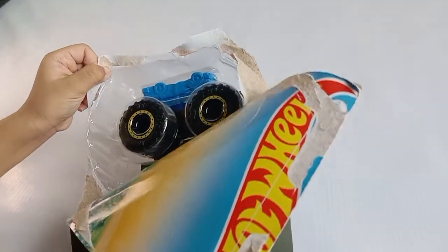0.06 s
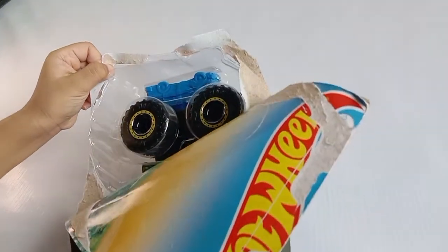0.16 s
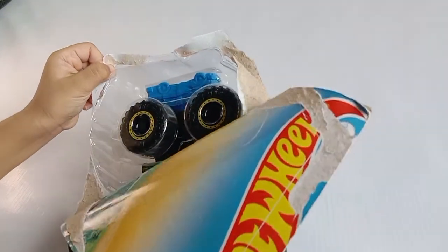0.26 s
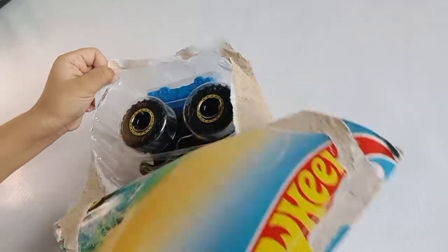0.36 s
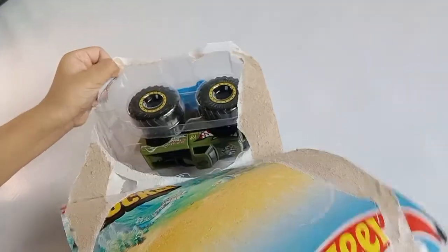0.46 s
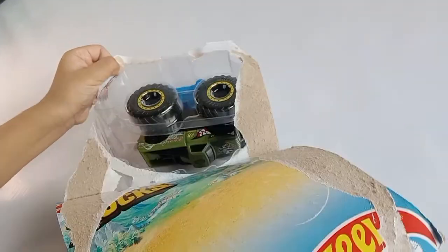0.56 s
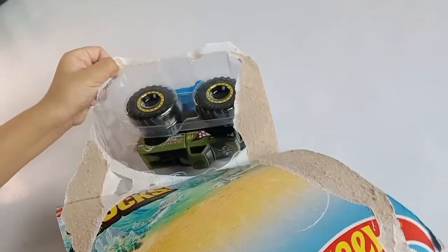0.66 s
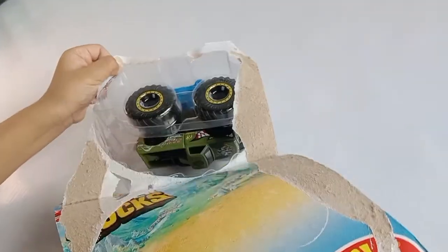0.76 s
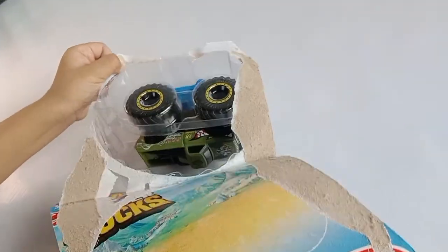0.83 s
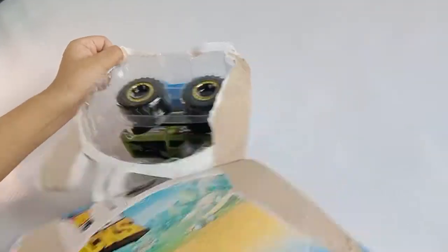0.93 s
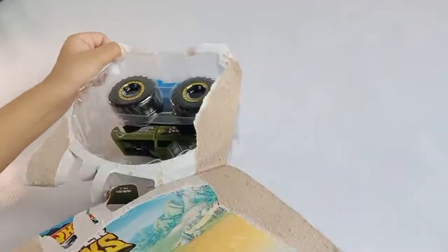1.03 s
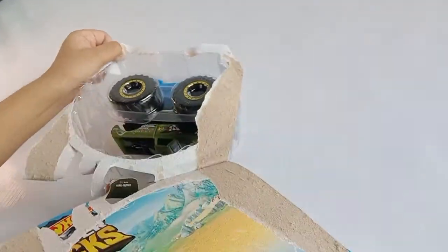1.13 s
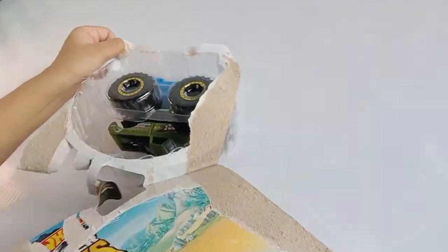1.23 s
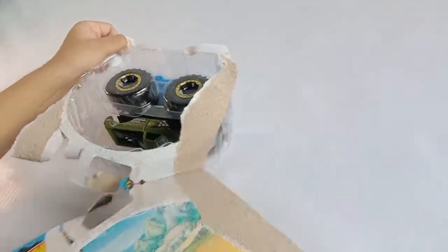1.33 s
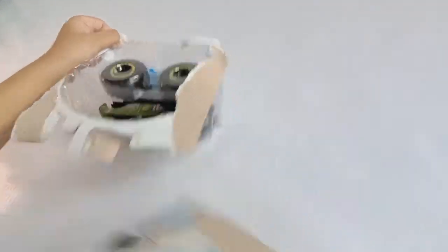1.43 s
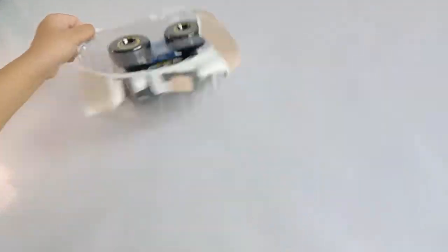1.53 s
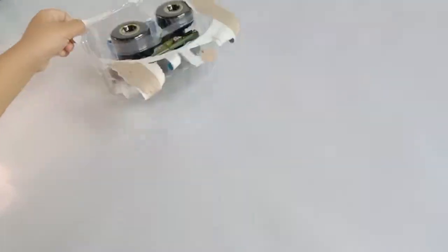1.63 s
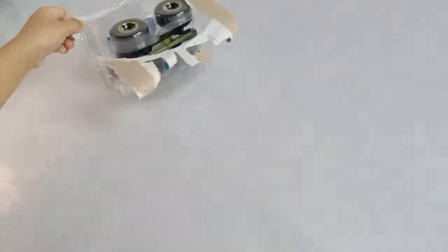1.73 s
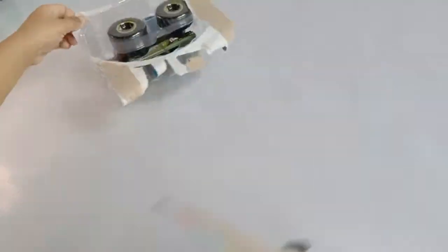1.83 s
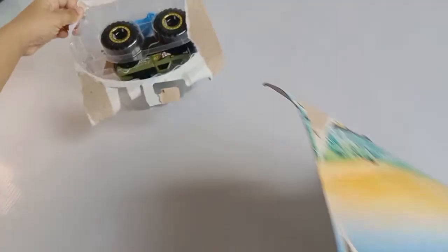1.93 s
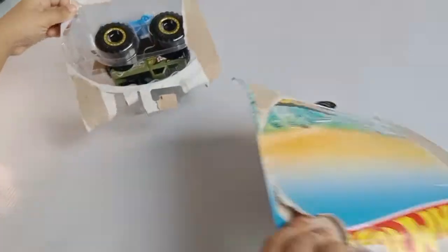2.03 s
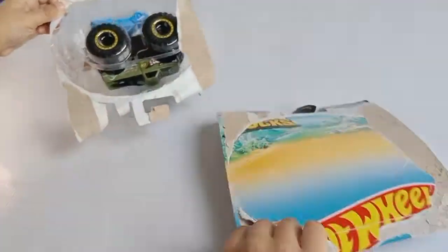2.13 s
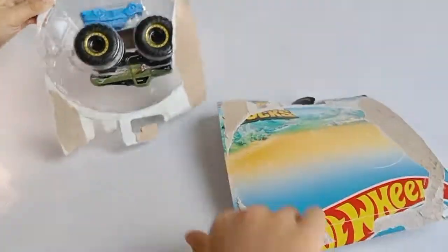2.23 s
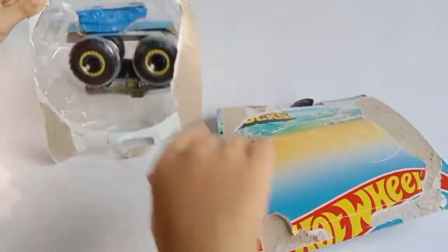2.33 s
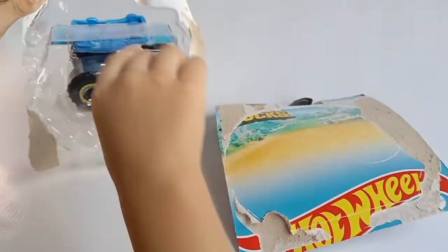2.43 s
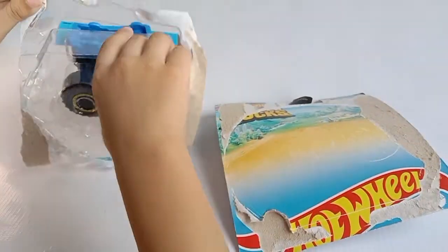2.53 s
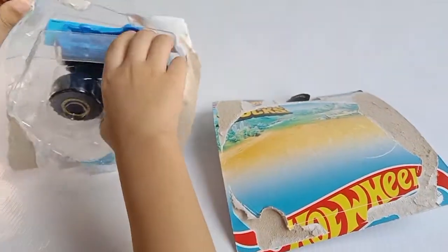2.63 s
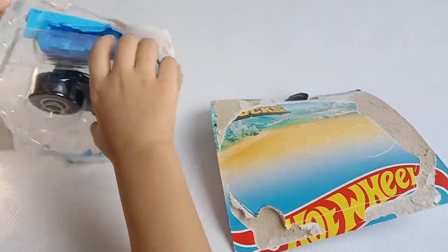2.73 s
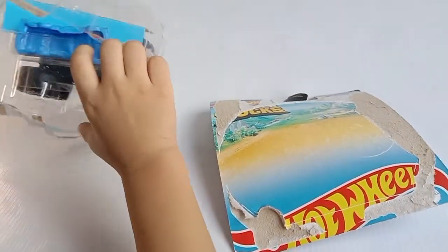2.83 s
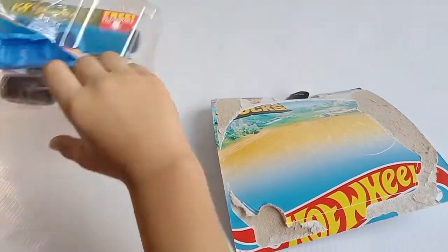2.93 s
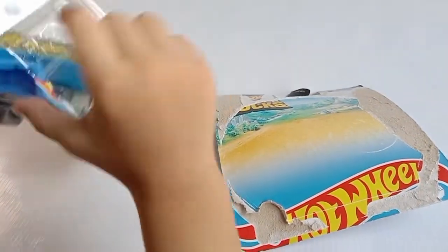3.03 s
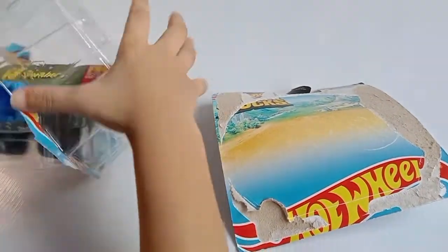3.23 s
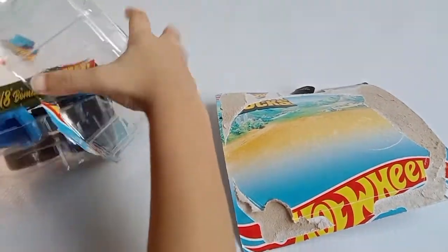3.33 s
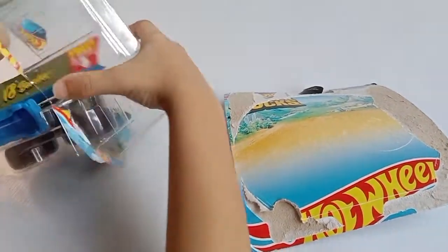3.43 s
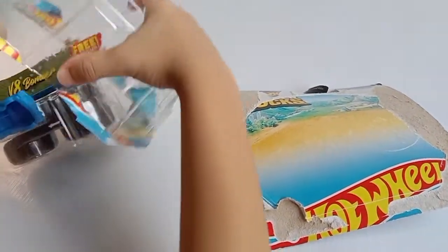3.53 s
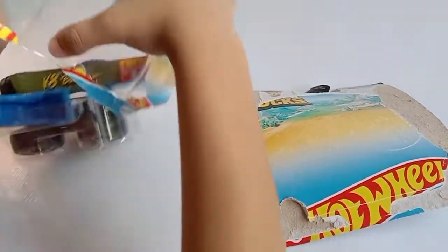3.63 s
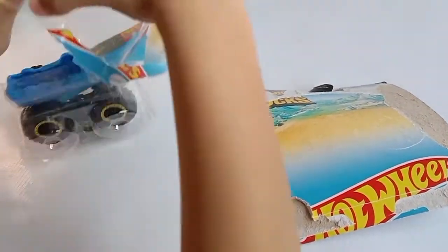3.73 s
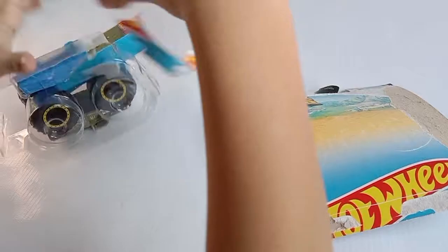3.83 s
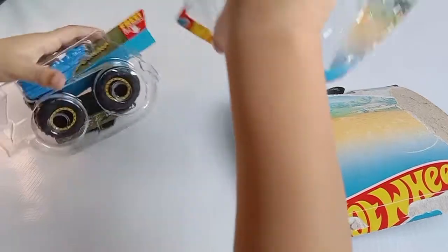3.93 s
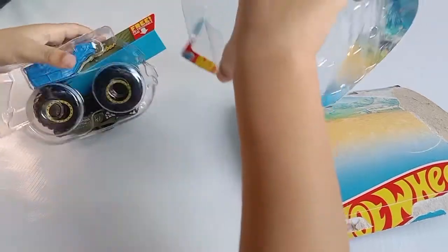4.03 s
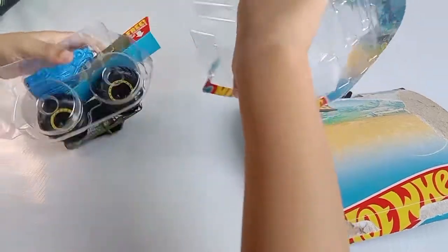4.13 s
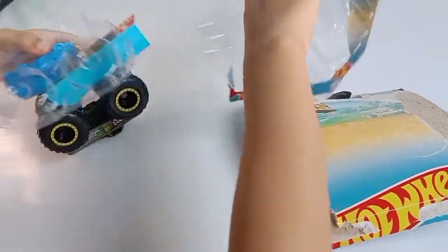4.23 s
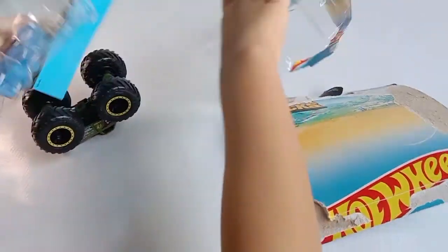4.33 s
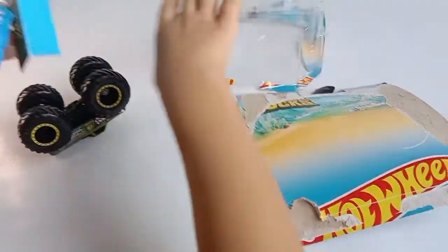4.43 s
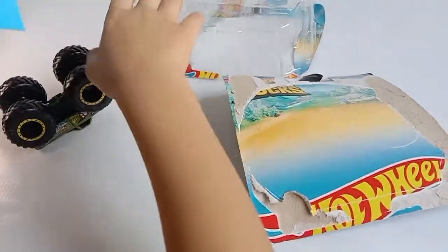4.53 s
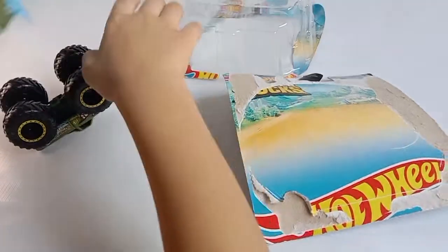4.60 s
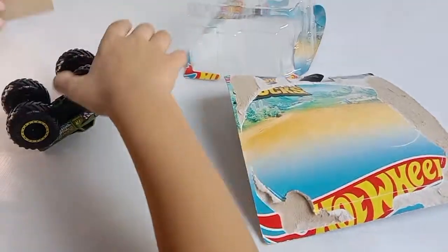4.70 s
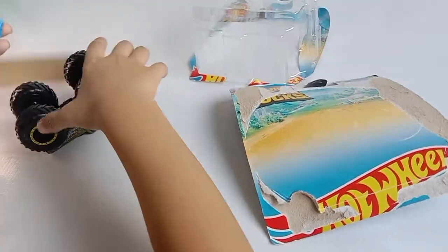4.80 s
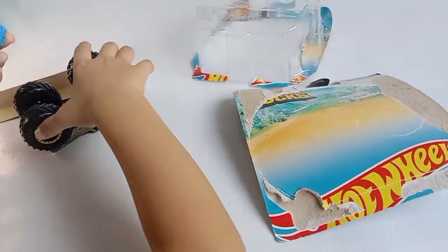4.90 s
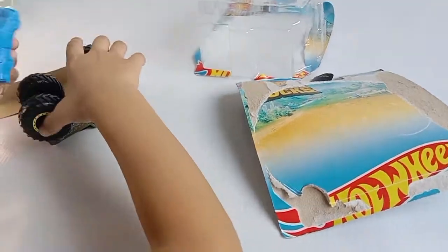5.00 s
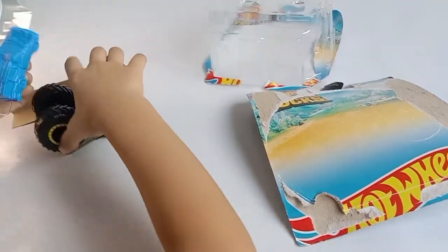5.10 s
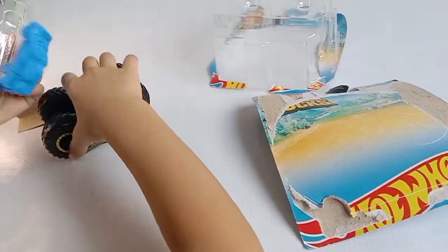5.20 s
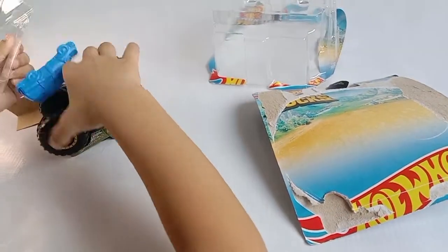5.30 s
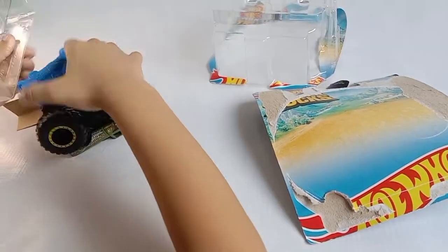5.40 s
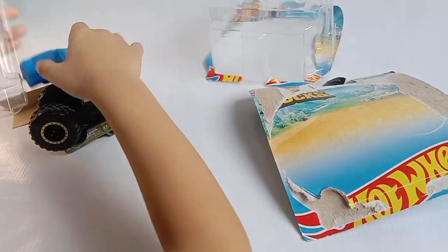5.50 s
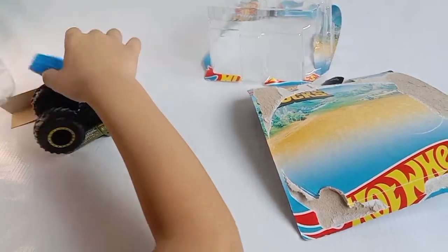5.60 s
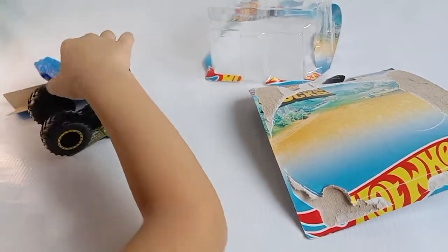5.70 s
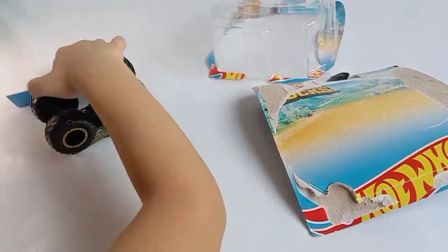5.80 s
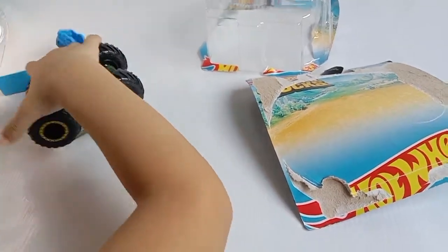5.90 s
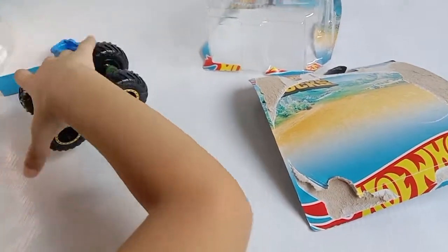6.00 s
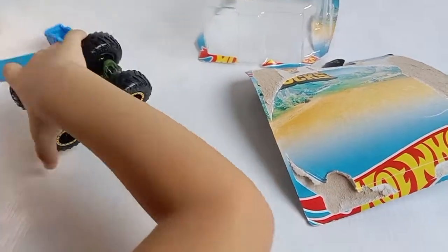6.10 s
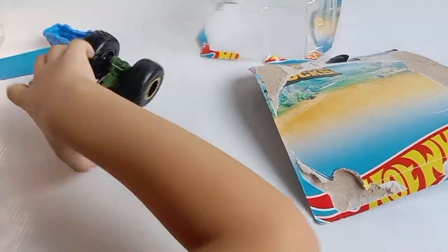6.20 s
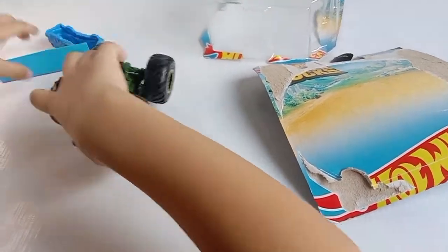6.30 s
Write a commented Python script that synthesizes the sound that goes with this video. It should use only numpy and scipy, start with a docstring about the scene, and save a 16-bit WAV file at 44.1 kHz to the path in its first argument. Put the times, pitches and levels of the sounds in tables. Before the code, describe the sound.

Close up in a small, quiet room, cardboard tears in three coarse pulls with sharp pops. After a brief lull, a thin plastic shell buckles, crunches and snaps loudly, thumping the table. The handling softens to faint crinkles and ticks, then a hollow plastic toy gives a clear rattling knock near the end.

```python
"""At a table in a small room, hands tear open a toy package of card and a thin plastic shell.
Card fibres rip in three pulls; the shell then buckles, snaps, ticks and crackles: noise rings its modes.
The toy bumps the table top with blows and rubbing noise; the toy, a tab and single panels ring as dying tones.
A short noise tail is the room's echo; filtered noise makes a faint hiss and a low hum."""
import sys
import numpy as np
from scipy import signal
from scipy.fft import rfft, irfft, next_fast_len
from scipy.io import wavfile
from scipy.ndimage import uniform_filter1d, map_coordinates

SR = 44100
rng = np.random.default_rng(int(sys.argv[2]) if len(sys.argv) > 2 else 0)


def materialize(psi):
    """Save the field psi as 16-bit PCM at rate SR to the path in sys.argv[1].

    A 1-D psi becomes a single channel; in a 2-D psi each row is a channel.
    """
    bounded = np.clip(np.atleast_2d(psi).T, -1, 1)
    quanta = np.round(bounded * 32767).astype(np.int16)
    wavfile.write(sys.argv[1], SR, quanta)


N = 280033  # samples, 6.35 s

PARTED_S = 1.6  # the card comes off
HANDS_REST_DB, TABLE_REST_DB = -86, -86  # nothing moving
# fizz over a boom of -40 dB, dB per dB of boom, dB per dB of crinkle
FIZZ_DB, FIZZ_GROWS, FIZZ_BRIGHT = -15.5, 0.54, 0.28


def package():
    """Steady handling and single snaps shake the same four bodies: shell, folds, fibres and table."""
    boom_db, crinkle_db, fizz_db, shell_hz, fold_hz = hands()
    shell_snaps, fold_snaps, fibre_snaps, table_snaps = snaps()
    breaks = crackle(per_second=250.0, spread_db=1.5, life=0.01, smooth=0.29)
    fine = crackle(per_second=500.0, spread_db=9.5, life=0.0018, smooth=0.69)
    card = np.arange(N) < PARTED_S * SR
    gentle_db = np.clip(-36 - crinkle_db, 0, 12)
    return (shell_boom(breaks, boom_db, shell_hz, shell_snaps, card)
            + fold_crinkle(breaks, fine, crinkle_db, fold_hz, fold_snaps, card, gentle_db)
            + tearing(breaks, fine, crinkle_db, card, gentle_db)
            + fibre_fizz(breaks, fine, fizz_db, fibre_snaps + ticks())
            + table_top(table_snaps))


# Three pulls that rip the card, one list each.
# Each row: time in seconds, level in dB, fizz over it in dB.
PULLS = [
    [(0.0, -48.5, -13.5), (0.166, -34, -10.5), (0.172, -26.5, -13.5), (0.208, -26.5, -11), (0.25, -21, -8),
     (0.402, -55, -11), (0.45, -53, -6.5), (0.49, -81, -3.5)],
    [(0.49, -84, -3), (0.622, -53.5, -2), (0.628, -48, -0.5), (0.71, -44, -7.5), (0.752, -29, -9.5),
     (0.826, -26.5, -15.5), (0.872, -38, -13.5), (0.94, -97.5, 8.5)],
    [(1.02, -84, -3), (1.094, -49.5, -9), (1.26, -31, -13.5), (1.286, -34.5, -13), (1.32, -27.5, -22.5),
     (1.336, -39.5, -21), (1.476, -43.5, -6.5), (1.63, -77.5, -4.5)],
]
PULL_SHELL_HZ, PULL_FOLD_HZ = [885, 1240, 1000], 2700  # favoured pitch of each pull; of all pulls
PULL_CRINKLE_DB = -9  # over the boom
# Squeezes and shifts of the shell. Each row: peak time in seconds, boom in dB, rise in seconds,
# fall in seconds, crinkle over the boom in dB, favoured shell pitch in Hz, favoured fold pitch in Hz.
SQUEEZES = [(0.03, -45, 0.046, 0.065, -19, 810, 2000), (0.155, -29.5, 0.11, 0.13, -10, 994, 1954),
            (1.768, -54.5, 0.024, 0.19, 2, 1100, 2040), (2.278, -29, 0.089, 0.058, -8, 830, 2370),
            (2.4, -54, 0.27, 0.32, 7, 890, 2500), (2.47, -52, 0.053, 0.72, -6.5, 725, 2300),
            (2.814, -24, 0.097, 0.18, -6, 760, 2170), (3.002, -27, 0.071, 0.11, -3.5, 800, 2500),
            (3.168, -22, 0.058, 0.2, -5, 725, 2580), (3.339, -30, 0.28, 0.093, -9, 830, 2450),
            (3.445, -26, 0.039, 0.11, -2, 910, 2330), (3.592, -30, 0.7, 0.14, -5.5, 855, 2390),
            (3.66, -36.5, 0.06, 0.037, 0, 870, 2370), (3.87, -45.5, 0.049, 0.17, 9, 870, 2680),
            (3.961, -44.5, 1, 0.056, -6.5, 890, 2550), (4.078, -48, 0.054, 0.17, -4, 780, 2600),
            (4.234, -28.5, 0.037, 0.19, -11, 613, 2540), (4.324, -36, 0.016, 0.16, -54, 516, 2380),
            (4.469, -54.5, 0.37, 0.12, -0.5, 610, 3000), (4.702, -55, 0.032, 0.15, 10, 673, 3100),
            (4.86, -47.5, 0.0048, 0.18, 4, 1250, 2120), (5.201, -65.5, 0.042, 1, -2, 610, 2390),
            (5.361, -70.5, 0.049, 0.31, 19.5, 616, 2240), (5.488, -53.5, 0.075, 0.091, -1, 718, 2700),
            (5.851, -51.5, 0.071, 0.062, -1.5, 1180, 2250), (5.75, -59.5, 0.068, 0.085, 8, 760, 2280),
            (5.944, -26, 0.027, 0.11, -10, 1140, 2360), (6.052, -51.5, 0.024, 0.11, 5.5, 1166, 2100),
            (6.31, -43, 0.092, 0.13, 3, 1400, 2180)]
SQUEEZE_SHAPE = 0.81  # how a fall bends: 1 straight, more lingers and then drops


def hands():
    """Pulls and squeezes add their power into boom, crinkle and fizz; the loudest steers the pitch."""
    t = np.arange(N) / SR
    pulls = np.array([np.interp(t, *np.transpose(pull)[:2], left=-200, right=-200) for pull in PULLS])
    pull_fizz_db = curves(np.vstack(PULLS))[1]
    squeezes = swells(SQUEEZES, SQUEEZE_SHAPE)
    db, bright, shell_hz, fold_hz = np.array(SQUEEZES).T[[1, 4, 5, 6]]
    squeeze_fizz_db = FIZZ_DB + (FIZZ_GROWS - 1) * (db + 40) + FIZZ_BRIGHT * bright

    boom = np.vstack([pulls, squeezes])
    crinkle = np.vstack([pulls + PULL_CRINKLE_DB, squeezes + bright[:, None]])
    fizz = np.vstack([pulls + pull_fizz_db, squeezes + squeeze_fizz_db[:, None]])
    all_fold_hz = np.r_[[PULL_FOLD_HZ] * len(PULLS), fold_hz]
    boom_db, shell_hz = blend(boom, HANDS_REST_DB, np.r_[PULL_SHELL_HZ, shell_hz])
    crinkle_db, fold_hz = blend(crinkle, HANDS_REST_DB, all_fold_hz)
    fizz_db, = blend(fizz, HANDS_REST_DB)
    return boom_db, crinkle_db, fizz_db, shell_hz, fold_hz


# Resonances of the plastic shell, each rung by two equal filters in a row.
# Each row: pitch in Hz, width of one filter in Hz, relative level in dB.
SHELL_MODES = [(383.6, 342, 0), (615.7, 87, 2.5), (683, 113, 2), (770.4, 170, -0.5), (885, 210, -0.5),
               (1061, 100, -1.5), (1197.7, 130, 4.5), (1273.6, 120, -5.5), (1474, 110, -3)]


def shell_boom(breaks, boom_db, shell_hz, blows, card):
    """Crackling force rings the broad panels of the shell; the card makes that force smoother."""
    force = np.where(card, unit(breaks + rng.standard_normal(N)), breaks)
    focus_db, swell_db = np.where(card, 8, 7.0), np.where(card, 2.5, 4.5)
    return struck(amp(boom_db) * force, shell_hz, blows, SHELL_MODES, focus_db, swell_db)


# Resonances of the small folds, each rung by two equal filters in a row.
# Each row: pitch in Hz, width of one filter in Hz, relative level in dB.
FOLD_MODES = [(1814, 410, 4), (2128, 200, 4), (2366, 310, 4.5), (2742, 260, 1), (2987, 720, 1),
              (3340, 310, 2.5), (3786, 540, 4), (4284, 710, 1.5), (5320, 870, 1.5)]


def fold_crinkle(breaks, fine, crinkle_db, fold_hz, blows, card, gentle_db):
    """Tearing card excites all folds evenly; soft handling of plastic rings only folds near the grip."""
    force = amp(crinkle_db) * unit(breaks + 0.75 * fine)
    focus_db = np.where(card, 1.5, 10.0 + 1.8 * gentle_db)
    swell_db = np.where(card, 1.5, 3.0)
    return struck(force, fold_hz, blows, FOLD_MODES, focus_db, swell_db)


# Colour of fibres and creases parting. Each row: pitch in Hz, relative level per Hz in dB.
TEAR_COLOUR = [(400, -31), (900, -6), (1600, 2.5), (3000, -1), (4500, 0), (6500, -11), (9000, -15),
               (16000, -40)]
TEAR_DB = 0.5, -6.5  # over the crinkle: card on, card off


def tearing(breaks, fine, crinkle_db, card, gentle_db):
    """Fibres and creases part in patches of coloured noise, weaker in soft handling of plastic."""
    level_db = crinkle_db + np.where(card, *TEAR_DB) - ~card * gentle_db / 2
    return amp(level_db) * filtered(patchy(breaks + fine, depth_db=5.0), coloured(TEAR_COLOUR))


# Colour of the fibres' fizz. Each row: pitch in Hz, relative level per Hz in dB.
FIZZ_COLOUR = [(2820, -29.5), (4800, -2.5), (5130, -10.5), (5550, -2), (6120, 0), (7840, 0), (8880, -8),
               (9440, -16), (11300, -13.5), (12700, -7), (15200, -3), (16200, -12), (16500, -41.5)]
# Level of the top of the steady fizz, above 11.5 kHz. Each row: time in seconds, gain in dB.
SHEEN_CURVE = [(0, 5.5), (.5, -1), (1.4, 6.5), (1.7, -4), (2.1, 1.5), (2.5, 5), (2.9, -2), (3.5, -3),
               (3.8, -18), (4.4, 4), (5.0, -15), (5.8, -29.5), (6.35, -6)]
SNAP_SHEEN_DB = -4  # the same for snaps and ticks


def fibre_fizz(breaks, fine, fizz_db, blows):
    """Fine breaks fizz in the treble; card fizzes higher than plastic, so the top has its own level."""
    steady = amp(fizz_db) * patchy(0.041 * breaks + fine, depth_db=3.0)
    fizz = np.array([filtered(x, coloured(FIZZ_COLOUR)) for x in (steady, blows)])
    highpass = signal.butter(6, 11500.0, "high", fs=SR, output="sos")
    top = signal.sosfiltfilt(highpass, fizz)
    sheen_db, = curves(SHEEN_CURVE)
    return fizz.sum(0) + (amp(sheen_db) - 1) * top[0] + (amp(SNAP_SHEEN_DB) - 1) * top[1]


# Single snaps. Each row: start in seconds, level in dB, crinkle over it in dB,
# rattle t60 in seconds (of the shell), favoured shell pitch in Hz, favoured fold pitch in Hz.
SNAP_LIST = [(0.17, -15.5, -20, 0.083, 885, 1800), (0.235, -18, -12, 0.045, 940, 2100),
             (0.278, -19.5, -2.5, 0.17, 560, 1990), (0.436, -51.5, 8, 0.051, 938, 3340),
             (0.629, -59, 18.5, 0.19, 925, 2090), (0.744, -30.5, 3, 0.073, 1150, 3740),
             (0.8, -18, -6, 0.073, 1120, 3370), (0.951, -48.5, -0.5, 0.11, 620, 1930),
             (1.099, -45.5, 2, 0.073, 1190, 3700), (1.168, -28.5, -7.5, 0.031, 960, 2170),
             (1.223, -20, -21, 0.11, 970, 1840), (1.254, -22.5, -12.5, 0.12, 1170, 4090),
             (1.299, -25.5, -7, 0.11, 1240, 1880), (1.313, -20, -5.5, 0.027, 1190, 3450),
             (1.766, -56.5, -8, 0.061, 1120, 1900), (2.035, -55, 3, 0.16, 1270, 2300),
             (2.176, -49, -8, 0.18, 1240, 1870), (2.225, -36.5, -7, 0.069, 603, 1850),
             (2.249, -31.5, -6, 0.11, 574, 2730), (2.275, -31.5, -12, 0.052, 920, 1740),
             (2.35, -45, -3, 0.096, 840, 2720), (2.446, -40, -7.5, 0.13, 670, 3240),
             (2.762, -24, -6.5, 0.03, 870, 2330), (2.795, -22.5, -8, 0.086, 630, 2230),
             (2.849, -18.5, -20, 0.077, 810, 1680), (2.925, -52, 16, 0.27, 1280, 1870),
             (2.977, -28, -9, 0.14, 840, 1720), (3.005, -23.5, -2, 0.088, 666, 1740),
             (3.146, -25, -2, 0.25, 860, 2590), (3.161, -13.5, -25, 0.13, 1050, 2380),
             (3.172, -18, -4.5, 0.11, 660, 2920), (3.197, -28, 1.5, 0.18, 980, 1840),
             (3.255, -22.5, -6.5, 0.056, 624, 1820), (3.324, -24.5, -25, 0.064, 870, 1790),
             (3.442, -12.5, -11, 0.069, 850, 2630), (3.508, -30, 5.5, 0.11, 1320, 2500),
             (3.526, -19.5, -12, 0.081, 840, 1840), (3.569, -20.5, -0.5, 0.16, 880, 2400),
             (3.753, -38, -21.5, 0.043, 1210, 1700), (3.789, -28.5, -9.5, 0.076, 820, 2180),
             (3.847, -36.5, 6.5, 0.071, 764, 3620), (3.871, -34, 5.5, 0.072, 730, 3720),
             (3.949, -48, 18, 0.092, 615, 2160), (4.066, -48.5, 4.5, 0.049, 1250, 2040),
             (4.091, -37.5, -7, 0.049, 1290, 1650), (4.159, -37.5, -7.5, 0.22, 630, 2030),
             (4.223, -17.5, -12, 0.092, 500, 2850), (4.314, -26, -26, 0.057, 460, 2070),
             (4.393, -35, -12, 0.1, 1160, 2310), (4.452, -48, 7.5, 0.12, 587, 2280),
             (4.701, -45, 2, 0.12, 687, 4100), (4.784, -66, 19.5, 0.072, 619, 1860),
             (4.861, -45.5, -14, 0.035, 1280, 2190), (5.347, -56.5, 5.5, 0.076, 594, 2330),
             (5.464, -43.5, 2, 0.092, 635, 2980), (5.898, -56.5, 14.5, 0.22, 1240, 2290),
             (5.926, -22, -1, 0.12, 1130, 2290), (6.307, -49, 3, 0.057, 1250, 1690)]
CRACK_S, CRACK_DB = 0.0023, 6.5  # t60 of a snap's first crack, its level over the fizz
SNAP_FIZZ_DB, SNAP_CARD_DB, SNAP_TABLE_DB = 7, -10, -30  # fizz, extra while the card is on, table push
SNAP_BRIGHT = 0.51  # dB of fizz per dB of crinkle


def snaps():
    """Each snap is a blow and a rattle on every shell mode, every fold mode, the fibres and the table."""
    shell, folds, rest = (np.zeros((rows, N + SR)) for rows in (len(SHELL_MODES), len(FOLD_MODES), 2))
    for s, db, bright, t60, shell_hz, fold_hz in SNAP_LIST:
        fizz = FIZZ_DB + SNAP_FIZZ_DB + SNAP_CARD_DB * (s < PARTED_S)
        fizz += (FIZZ_GROWS - 1) * (db + 39.5) + SNAP_BRIGHT * bright
        # rows: shell, folds, fibres, table, first crack; high modes settle first
        body_t60 = max(t60, 0.01) * np.array([1, 0.78, 0.43, 0.84])
        rattle = rattles([*body_t60, CRACK_S], [1, 1, 0, 1, 0])
        rattle *= amp(db + np.c_[[0, bright, fizz, SNAP_TABLE_DB, fizz + CRACK_DB]])
        rattle[2] += rattle[4]
        start = round(s * SR)
        at = slice(start, start + rattle.shape[1])
        shell[:, at] += favour(SHELL_MODES, shell_hz, focus_db=31.0) * rattle[0]
        folds[:, at] += favour(FOLD_MODES, fold_hz, focus_db=10) * rattle[1]
        rest[:, at] += rattle[2:4]
    return shell[:, :N], folds[:, :N], *rest[:, :N]


def favour(modes, hz, focus_db):
    """Gain of each mode: less in octaves away from a pitch, with a random spread."""
    octaves = np.log2(np.array(modes)[:, :1] / hz)
    return amp(-focus_db * octaves ** 2 + rng.normal(0, 1.9, (len(modes), 1)))


# Thin treble ticks. Each row: start in seconds, level in dB.
TICK_LIST = [(0.3595, -55), (0.591, -48), (2.17, -51.5), (2.315, -45.5), (3.743, -45.5), (3.9076, -39.5),
             (4.26, -40), (4.3963, -46.5), (4.686, -45.5), (5.8082, -55), (5.852, -55), (5.898, -46),
             (6.0995, -51.5)]


def ticks():
    """Short noise rattles on the fibres alone, without a blow."""
    out = np.zeros(N + SR)
    for s, db in TICK_LIST:
        out[round(s * SR):][:SR // 4] += amp(db) * rattles([0.031], [0])[0]  # t60 in s
    return out[:N]


# Things bumping, rubbing and rolling on the table. Each row: peak time in seconds, level in dB,
# rise in seconds, fall in seconds, favoured table pitch in Hz.
BUMP_LIST = [(0.228, -41, 0.36, 0.22, 206), (0.31, -35, 0.23, 0.093, 72), (0.749, -34.5, 0.0074, 0.13, 175),
             (1.041, -58, 0.17, 0.11, 126), (1.229, -45.5, 0.0081, 0.25, 150),
             (1.309, -34, 0.079, 0.19, 192), (1.763, -49, 0.01, 0.044, 128), (2.239, -46, 0.057, 0.12, 195),
             (2.508, -54.5, 0.21, 0.012, 260), (2.808, -46, 0.061, 0.32, 272), (3, -45.5, 0.021, 0.07, 260),
             (3.159, -24, 0.0087, 0.075, 148), (3.25, -46.5, 0.032, 0.14, 172),
             (3.332, -34, 0.029, 0.068, 173), (3.45, -41.5, 0.016, 1, 173), (3.565, -15, 0.011, 0.051, 130),
             (3.65, -46, 0.11, 0.28, 148), (3.795, -33.5, 0.056, 0.065, 100), (3.97, -52, 0.72, 0.17, 131),
             (4.16, -45, 0.13, 0.12, 176), (4.226, -25, 0.014, 0.064, 165),
             (4.315, -27, 0.0086, 0.064, 165.6), (4.401, -47, 0.019, 0.07, 187),
             (4.46, -57.5, 0.2, 0.22, 197), (4.703, -50.5, 0.045, 0.077, 192),
             (4.889, -50.5, 0.06, 0.53, 246), (5.299, -56.5, 0.46, 0.14, 255),
             (5.129, -43.5, 0.012, 0.22, 109), (5.26, -55, 0.056, 0.076, 100),
             (5.481, -40.5, 0.074, 0.1, 133), (5.679, -52.5, 0.067, .1, 98),
             (5.748, -39.5, 0.068, 0.15, 153), (5.928, -30, 0.013, 0.11, 171),
             (6.171, -54, 0.14, 0.044, 235), (6.31, -47, 0.24, .4, 152)]
BUMP_SHAPE = 1.19  # how a fall bends: 1 straight, more lingers and then drops
# blow over the rub; less after a slow rise; share of the rise it comes early; t60 of its rattle
KNOCK_DB, SOFTER_DB_PER_S, LEAD, RATTLE_S = -3.1, 158, 0.25, 0.072
# Resonances of the table top, each rung by two equal filters in a row.
# Each row: pitch in Hz, width of one filter in Hz, relative level in dB.
TABLE_MODES = [(71, 12, 0), (106, 55, -0.5), (174.3, 43, -2), (245, 31, 0), (281, 25, -11.5)]


def table_top(pushes):
    """Rubbing noise swells around each bump, a blow strikes early in it, and both ring the table."""
    blows = np.pad(pushes, (0, SR))
    for s, db, rise, *_ in BUMP_LIST:
        knock = amp(db + KNOCK_DB - SOFTER_DB_PER_S * rise) * rattles([RATTLE_S], [1])[0]
        blows[round((s - LEAD * rise) * SR):][:len(knock)] += knock
    favoured_hz = np.array(BUMP_LIST)[:, 4]
    rumble_db, table_hz = blend(swells(BUMP_LIST, BUMP_SHAPE), TABLE_REST_DB, favoured_hz)
    rubbing = crackle(per_second=200.0, spread_db=1.5, life=0.005, smooth=0.6)
    return struck(amp(rumble_db) * rubbing, table_hz, [blows[:N]] * len(TABLE_MODES), TABLE_MODES,
                  focus_db=10.5, swell_db=2.0)


# Modes of the hollow plastic toy. Each row: pitch in Hz, relative level in dB, t60 in seconds.
TOY_MODES = [(704, 0.8, 0.14), (1147, 4.5, 0.085), (1292, 5, 0.028), (1600, -10, 0.066),
             (1940, -2.5, 0.044), (2270, -10, 0.05), (2530, -16, 0.023)]
# The toy knocks and chatters. Each row: start in seconds, level in dB, brightness in dB per octave.
TOY_KNOCKS = [(5.929, -26, -1), (5.944, -36, 12), (5.961, -31, 0), (5.968, -30, -4), (6.031, -42.5, 8),
              (6.039, -49, 1), (6.047, -43, 13.5), (6.058, -51.5, 11.5)]
# Modes of a stiff plastic tab. Each row: pitch in Hz, relative level in dB, t60 in seconds.
TAB_MODES = [(800, 0.5, 0.043), (2170, 1, 0.02), (3830, 0, 0.024)]
# The tab springs free. Each row: start in seconds, level in dB.
TAB_FLICKS = [(3.8468, -26.5), (3.8719, -22.5)]
# One panel pops and rings alone. Each row: start in seconds, level in dB, pitch in Hz, t60 in seconds.
PANEL_POPS = [(0.018, -38.5, 788, 0.07), (0.082, -43, 744, 0.077), (0.236, -21, 933, 0.027),
              (0.251, -9, 870, 0.029), (0.63, -37.5, 941, 0.059), (1.319, -15, 1267, 0.037),
              (1.765, -40.5, 200, 0.084), (1.766, -49.5, 1130, 0.1), (2.2755, -23.5, 1140, 0.0073),
              (2.975, -15.5, 878, 0.063), (3.004, -13, 671, 0.06), (3.256, -30, 947, 0.057),
              (3.272, -28.5, 1740, 0.062), (3.326, -26, 932, 0.052), (3.346, -26, 1754, 0.053),
              (3.444, -14, 1170, 0.038), (3.472, -19.5, 660, 0.025), (3.571, -21, 2360, 0.058),
              (3.585, -15, 803, 0.041), (4.225, -19, 193, 0.074), (4.228, -16.5, 1090, 0.033),
              (4.236, -20.5, 573, 0.07), (4.314, -22, 584, 0.091), (4.331, -33.5, 1100, 0.076),
              (4.452, -46.5, 2310, 0.11), (4.873, -42.5, 1290, 0.091), (4.875, -47.5, 2190, 0.053),
              (5.128, -38.5, 107, 0.24), (5.184, -40.5, 184, 0.094), (5.178, -55, 608, 0.26),
              (5.328, -54.5, 608, 0.1), (5.398, -44, 2260, 0.046), (5.466, -48.5, 630, 0.052)]
# Bare clicks of a fibre or fold giving way. Each row: start in seconds, level in dB.
CLICK_LIST = [(0.2781, -4), (0.6264, -30), (.7862, -27), (1.169, -32), (1.364, -29), (3.949, -26),
              (5.9308, -19)]
CLICK_HZ, CLICK_S = 2690, 0.0013  # CLICK_S sets the rise; the fall is held to a t60 of 2 ms
CONTACT_S, CHATTER_DB = 0.0016, 2.5  # longest rise of a ring, its unsteadiness


def rings():
    """Clean dying tones: the toy's modes at every knock, the tab, single panels and clicks."""
    out, t = np.zeros(N + SR), np.arange(SR // 4) / SR
    toy = [(s, db + level + bright * np.log2(hz / 1000) + rng.normal(0, 2), hz, t60)
           for s, db, bright in TOY_KNOCKS for hz, level, t60 in TOY_MODES]
    tab = [(s, db + level, hz, t60) for s, db in TAB_FLICKS for hz, level, t60 in TAB_MODES]
    clicks = [(s, db, CLICK_HZ, CLICK_S) for s, db in CLICK_LIST]
    for s, db, hz, t60 in toy + tab + PANEL_POPS + clicks:
        chatter_db = CHATTER_DB * map_coordinates(rng.standard_normal(64), [t * 200])
        drift = 0.5 * np.cumsum(rng.standard_normal(len(t))) / np.sqrt(len(t))
        phase = 2 * np.pi * (hz * t + rng.random()) + drift
        decay = amp(db - 60 * t / max(t60, 0.002) + chatter_db)
        onset = 1 - np.exp(-t / min(CONTACT_S, t60 / 20))
        out[round(s * SR):][:len(t)] += decay * onset * np.sin(phase)
    return out[:N]


# Decay of the room. Each row: pitch in Hz, t60 in seconds.
ROOM_DECAY = [(100, 0.11), (700, 0.13), (4000, 0.15), (13000, 0.054)]


def room(x):
    """A noise tail, 200 samples late, in which each frequency dies at its own speed."""
    hz, t, z = signal.stft(rng.standard_normal(SR // 2), SR, nperseg=256)
    decay = amp(-60 * t / along(ROOM_DECAY, hz)[:, None])
    tail = signal.istft(z * decay, SR, nperseg=256)[1]
    return signal.fftconvolve(np.pad(x, (200, 0)), tail / np.linalg.norm(tail))[:N]


# Colour of the hiss. Each row: pitch in Hz, relative level per Hz in dB.
HISS_COLOUR = [(18, -24.5), (30, 3), (181, -8), (261, -4), (533, -14), (1840, -11), (2050, -12.5),
               (4900, -17), (8530, -7), (9700, -36), (16500, -45)]
# Wavering level of the low hum. Each row: time in seconds, level in dB.
HUM_LEVEL = [(0.0, -59), (.35, -64.5), (1.2, -70), (1.6, -74), (2.2, -73.5), (2.8, -63), (3.1, -73.5),
             (4.8, -77), (5.2, -62), (6.35, -68.5)]


def background():
    """Steady coloured hiss, and noise through one narrow resonance as a wavering hum."""
    hz, width = 58, 7.0
    hum = filtered(rng.standard_normal(N),
                   lambda f: 1j * f * width / (hz * hz - f * f + 1j * f * width) + 1e-9)
    hiss = filtered(rng.standard_normal(N), coloured(HISS_COLOUR))
    return amp(curves(HUM_LEVEL)[0]) * hum + amp(-74.5) * hiss


def struck(steady, steady_hz, blows, modes, focus_db, swell_db):
    """A body rung mode by mode; the grip favours modes near its pitch, and each swells by itself."""
    out, power = np.zeros(N), 0
    for k, (hz, width, db) in enumerate(modes):
        gain = amp(db - focus_db * np.log2(hz / steady_hz) ** 2 + swell_db * wobble(25.0))
        force = gain * steady + amp(db) * blows[k]
        peak = signal.iirpeak(hz, hz / width, SR)
        out += signal.lfilter(*peak, signal.lfilter(*peak, force))  # twice for steep skirts
        power += amp(2 * db) * np.pi * width / SR / 2
    return out / np.sqrt(power)


def rattles(t60, blow):
    """A short blow on top of a lumpy noise rattle that builds up and dies, one row for each body."""
    t, t60 = np.arange(SR // 4) / SR, np.c_[t60]
    lumps = amp(np.repeat(rng.standard_normal(len(t) // 105), 105))
    force = amp(-60 * t / t60) * lumps * rng.standard_normal((len(t60), len(t)))
    force *= 1 - np.exp(-t / (0.027 * t60))  # build-up as a share of t60
    force[:, :12] += 3 * np.hanning(12) * np.c_[blow]
    return force


def crackle(per_second, spread_db, life, smooth):
    """Tiny breaks at random moments, each a burst dying over life in s, over a smooth rustle."""
    sizes = amp(spread_db * np.minimum(rng.exponential(size=N), 4))
    hits = (rng.random(N) < per_second / SR) * sizes
    bursts = signal.lfilter([1], [1, -np.exp(-1 / (life * SR))], hits)
    return rng.standard_normal(N) * unit(smooth + (1 - smooth) * unit(bursts))


def patchy(x, depth_db):
    """Random patches of gain in time and pitch, scaled to rms 1."""
    z = signal.stft(x, nperseg=256)[2]
    field = uniform_filter1d(rng.standard_normal(z.shape), size=4, axis=0)
    field = uniform_filter1d(field, size=5, axis=1)
    return unit(signal.istft(z * amp(depth_db * unit(field)), nperseg=256)[1][:N])


def swells(rows, shape):
    """Level in dB of each (peak s, dB, rise s, fall s) row: straight up, then down along a bend."""
    s, db, rise, fall = np.array(rows)[:, :4].T[..., None]
    late = np.arange(N) / SR - s
    # 30 dB gained in a rise and lost in a fall
    return db - 30 * np.where(late < 0, -late / np.abs(rise), np.abs(late / fall) ** shape)


def blend(levels_db, rest_db, *values):
    """Summed level of overlapping swells, and values weighted by their power."""
    power = amp(2 * np.maximum(levels_db, -200))
    total_db = 10 * np.log10(power.sum(0) + amp(2 * rest_db))
    return [total_db] + [np.dot(v, power) / power.sum(0) for v in values]


def wobble(rate):
    """A smooth random curve, rate knots a second."""
    return map_coordinates(rng.standard_normal(int(N * rate / SR) + 4), [np.arange(N) * rate / SR])


def filtered(x, response):
    """x through a response of frequency that keeps the power of white noise."""
    m = next_fast_len(N + SR // 2)
    h = response(np.fft.rfftfreq(m, 1 / SR))
    return irfft(rfft(x, m) * unit(np.abs(h)) * np.exp(1j * np.angle(h)), m)[:N]


def coloured(points):
    """The response of a smooth spectrum."""
    return lambda f: amp(along(points, f))


def along(points, hz):
    """Values of (Hz, value) points, read on a log axis."""
    f, v = np.transpose(points)
    return np.interp(np.log(hz + 1), np.log(f + 1), v)


def curves(rows):
    """One value per sample for each column after the time."""
    s, *cols = np.transpose(rows)
    return [np.interp(np.arange(N) / SR, s, c) for c in cols]


def amp(db):
    """Gain of a level in dB."""
    return 10 ** (np.asarray(db) / 20)


def unit(x):
    """Scaled to rms 1."""
    return x / np.sqrt(np.mean(x ** 2) + 1e-20)


def scene():
    """The package and the toy near, their echo, the background."""
    near = package() + rings()
    return (near + amp(-17.0) * room(near) + background())[None]


def record(dry):
    """The top rolls off over 250 Hz, to nothing above 15.9 kHz."""
    hz = np.fft.rfftfreq(N, 1 / SR)
    return irfft(rfft(dry) * np.clip((15900 - hz) / 250, 0, 1) ** 2, N)


dry = scene()
out = record(dry)
materialize(out)
```